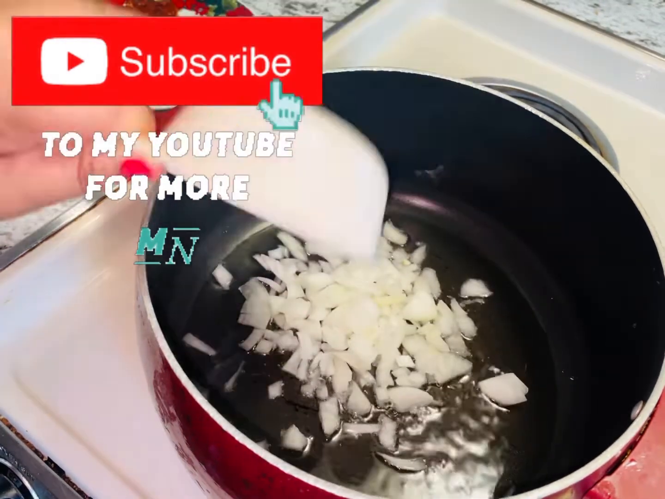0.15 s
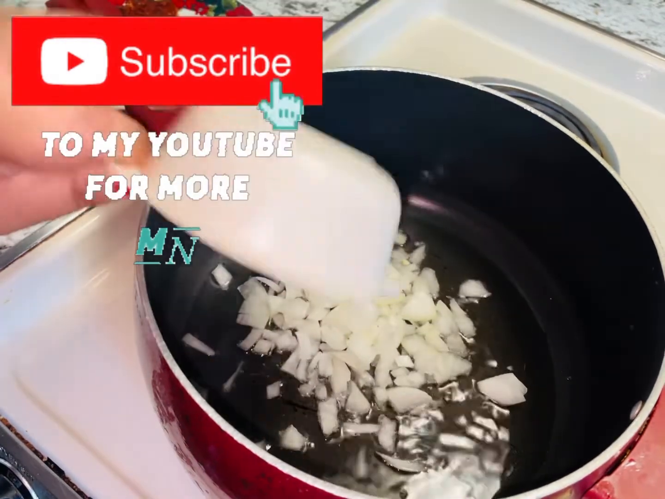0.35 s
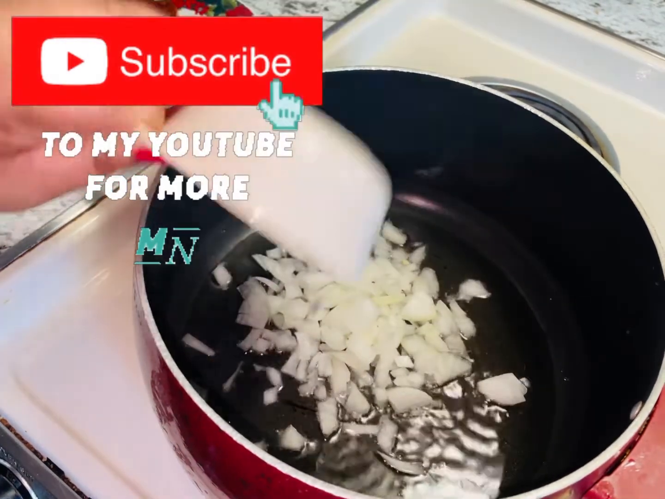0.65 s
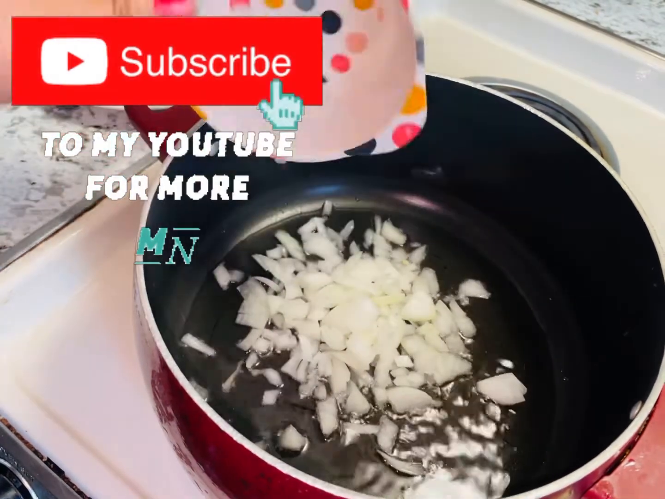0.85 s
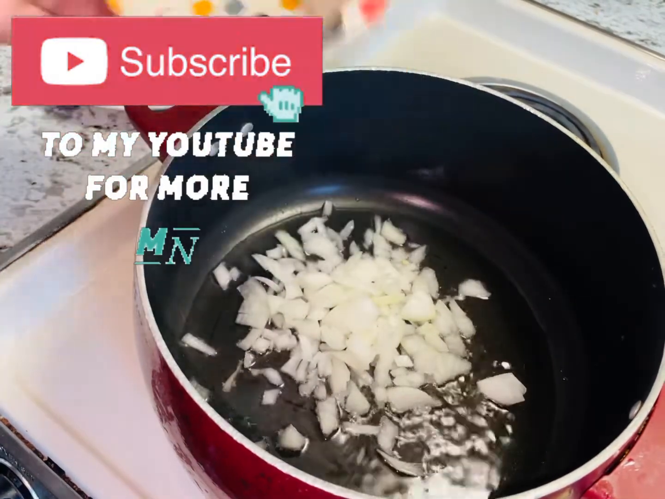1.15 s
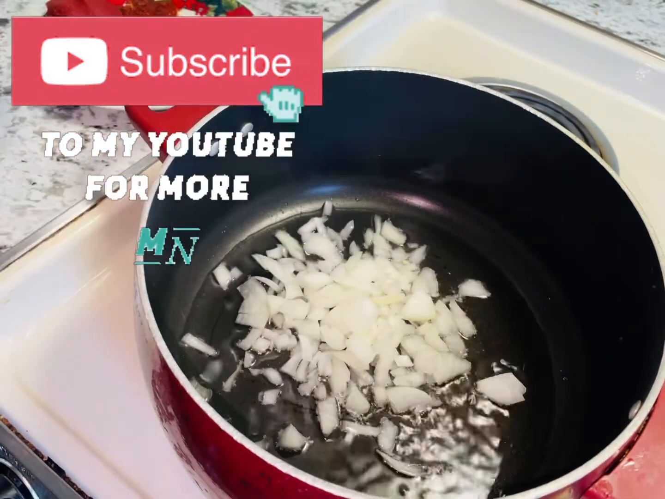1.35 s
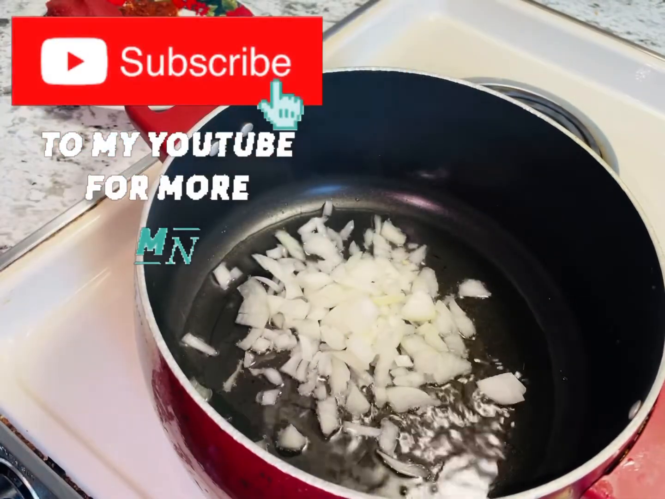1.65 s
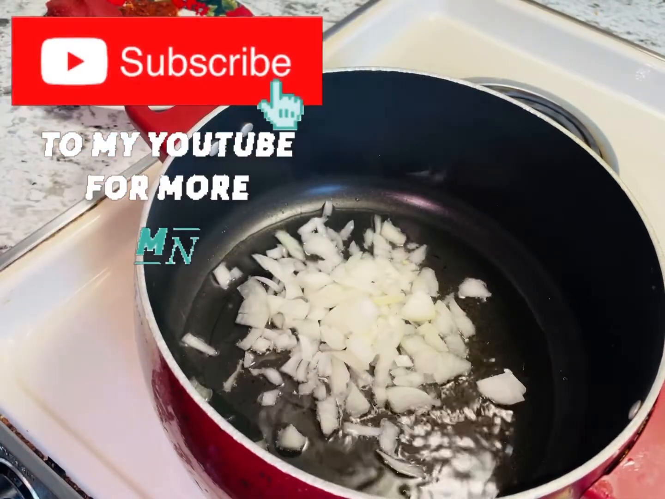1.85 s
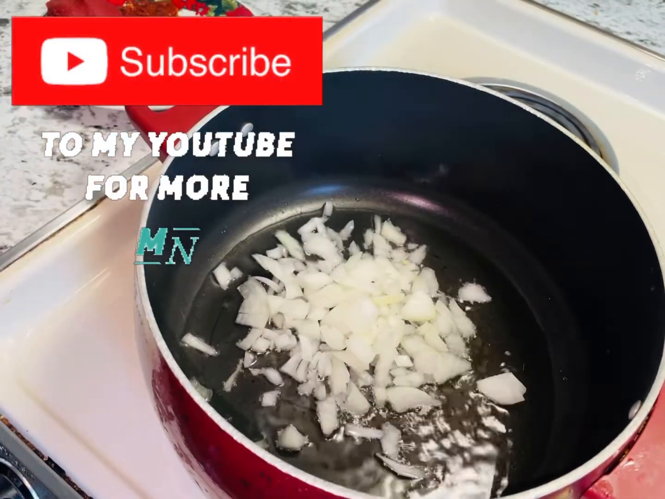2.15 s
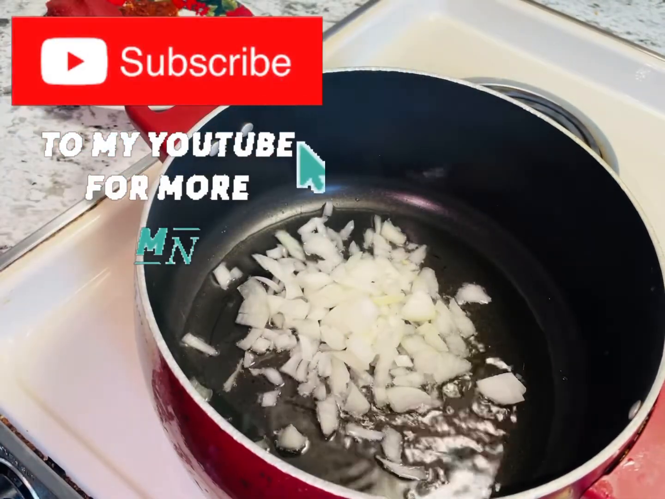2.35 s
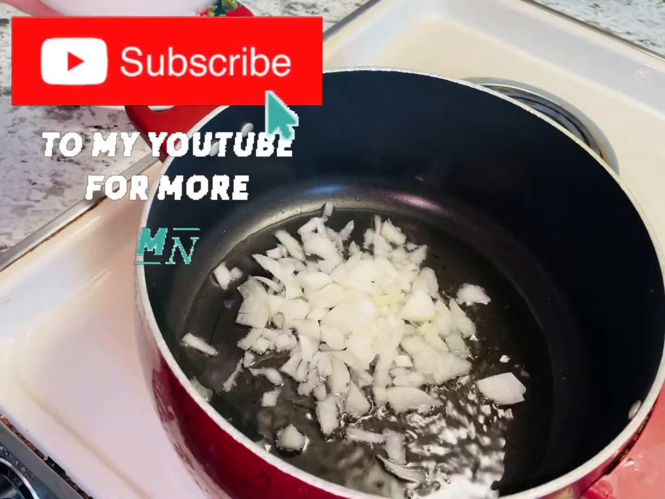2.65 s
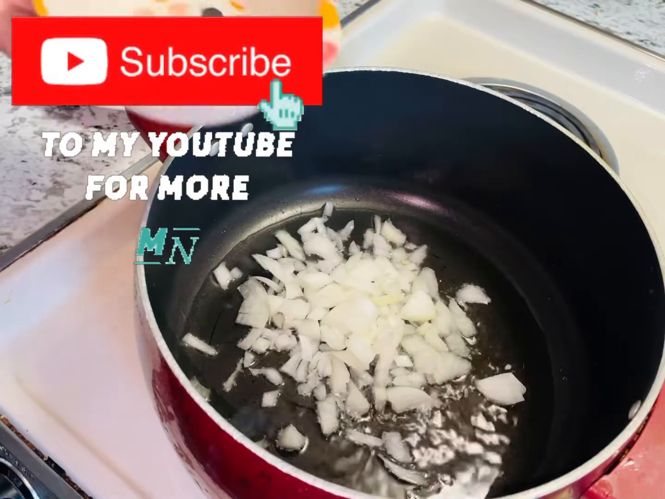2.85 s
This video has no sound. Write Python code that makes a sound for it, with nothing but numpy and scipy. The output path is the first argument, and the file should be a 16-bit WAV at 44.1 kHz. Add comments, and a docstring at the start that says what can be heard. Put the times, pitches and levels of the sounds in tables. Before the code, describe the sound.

Onion fries in hot oil with a steady, crackling sizzle in a kitchen. Early on a spatula knocks and briefly scrapes a bowl over the pot; then a utensil clacks twice as the sizzling eases slightly.

```python
"""Onion frying in a pot

Chopped onion sizzles in hot oil in a metal pot: bursting steam bubbles fizz and crackle, and water
drops flash to steam in sharp spits, all coloured by the pot's resonances. A spatula knocks once, then
taps and scrapes twice as it clears the bowl over the pot, driving modes by impact and by friction.
Later a utensil is set down with a double clack. An appliance hums underneath."""
import sys
import numpy as np
from scipy import signal
from scipy.fft import rfft, irfft
from scipy.io import wavfile

SR = 44100
rng = np.random.default_rng(int(sys.argv[2]) if len(sys.argv) > 2 else 0)


def to_wav(s):
    """Save 16-bit WAV."""
    ch = np.atleast_2d(s).T  # columns
    pcm = np.round(np.clip(ch, -1, 1) * 32767)  # PCM
    wavfile.write(sys.argv[1], SR, pcm.astype(np.int16))


N = 132300

# Background rumble: frequency_hz, density_db
RUMBLE_SPECTRUM = [(20, -53), (55, -27), (85, -3), (120, -1.5), (160, -4), (400, -8), (700, -16),
                   (3000, -20), (16000, -53)]
# Mains hum: pitch_hz, level_db
HUM_PARTIALS = [(59.6, -58), (119.6, -55)]
# Kitchen reverberation: frequency_hz, t60_s
ROOM_DECAY = [(100, 0.76), (1000, 0.45), (4000, 0.39), (14000, 0.21)]

# Utensil impacts: start_s, level_db, pitch_ratio
UTENSIL_IMPACTS = [(1.8305, -10.5, 1.03), (1.8392, -3, 1.25), (1.883, -0.5, 1.0), (1.8895, -9, 0.97)]
# Utensil modes: pitch_hz, level_db, t60_s
UTENSIL_MODES = [(1776, 1, .05), (1935, -6, .03), (2230, -4, .022), (2600, -7, .02), (3740, -4, .04)]
# Utensil contact noise: frequency_hz, density_db
CLACK_SPECTRUM = [(100, -13), (400, -5.5), (1200, -6.5), (2200, 2.5), (3200, -8), (5200, -7), (16000, -45)]

# Spatula impacts: start_s, thud_db, tick_db, ring_db
SPATULA_KNOCKS = [(0.1615, -3, -1, -2.5), (0.1717, -4, -10, -10), (0.433, -7, -13, -13.5),
                  (0.4438, -14, -16.5, -24), (0.6344, -6.5, -6, -14), (2.852, -31, -51, -27)]
# Spatula strokes: start_s, rise_s, hold_s, release_s, level_db
SPATULA_SCRAPES = [(0.47, 0.021, 0.06, 0.071, -36), (0.631, 0.057, 0.048, 0.069, -34)]
# Modes the spatula excites: pitch_hz, t60_s, struck_db, rubbed_db
VESSEL_MODES = [(159, 0.33, -28, -6), (264, 0.029, 2.5, -12), (405, 0.11, -10, -1), (461, 0.11, -3, -4),
                (545, 0.45, -6.5, -3.5), (827, 0.11, -7, -9), (904, 0.14, -2.5, -2.5),
                (950.5, .17, 1.5, -1.5), (1341, 0.098, 4.5, -9.5), (1438, 0.051, -0.5, -5.5),
                (2840, 0.036, 3, -13), (4850, 0.027, 2, -2)]
# Dull part of a knock: frequency_hz, density_db
THUD_SPECTRUM = [(60, -15), (200, -5.5), (400, 4.5), (900, -2.5), (1130, -10), (1400, 0), (1950, -10),
                 (5000, -8), (12000, -53)]
# Bright part of a knock: frequency_hz, density_db
TICK_SPECTRUM = [(300, -3), (1500, -11), (4000, -3.5), (5200, 1), (7200, 5.5), (9500, -5.5), (16000, -19)]
# Friction noise: frequency_hz, density_db
RUB_SPECTRUM = [(100, -5), (650, -2.5), (950, 6), (1170, -34), (1450, 2), (2800, 3.5), (5000, -1.5),
                (16000, -21)]

# Droplets hitting the pot: frequency_hz, density_db
SPRAY_SPECTRUM = [(1000, -20), (5000, -5), (10000, 0), (16000, 1)]
# Spits of oil: start_s, level_db, bubble_pitch_hz, relative_snap_db
OIL_SPITS = [(0.1422, -21, 8600, -14), (0.4752, -15.5, 12800, -10), (0.77, -24, 6450, -2),
             (0.902, -23.5, 5100, 9), (0.941, -23.5, 3620, 3.5), (1.134, -22.5, 3340, 2),
             (1.1579, -17.5, 5660, 8), (1.2971, -19, 3040, -2.5), (1.397, -19.5, 5400, -8),
             (1.463, -32.5, 1930, -10), (1.585, -19, 5230, -4), (1.996, -25.5, 5440, 6),
             (2.083, -23.5, 6770, 3.5), (2.14, -26, 3100, -10), (2.2212, -28.5, 8350, 7.5),
             (2.295, -30, 2520, 6), (2.483, -30, 3560, 3.5), (2.5955, -27.5, 6800, 5),
             (2.709, -30, 5680, 6), (2.7865, -27, 6700, 0)]
# Snap of a spit: frequency_hz, density_db
SNAP_SPECTRUM = [(500, -15), (2000, 2), (3500, 8), (6000, 19.5), (10000, 13.5), (16000, -8)]
# Frying noise: frequency_hz, density_db
SIZZLE_SPECTRUM = [(300, -40), (1000, -20.5), (3200, -6.5), (5600, 1.5), (8500, 0.5), (13500, -5.5),
                   (16000, -5.5)]
# Pot resonances: centre_hz, width_hz, gain_db
POT_RESONANCES = [(1864, 153, 13.8), (2450, 97, 9.7), (3050, 170, 11), (3650, 460, 5.7)]

RUMBLE_DB = -49.5
CLACK_RING_DB, CLACK_NOISE_DB = -23, -21
KNOCK_RING_DB, THUD_DB, TICK_DB, THUD_RISE_S = -23.5, -15.5, -13.5, 0.0019
RUB_NOISE_DB, RUB_RING_DB, SLIPS_PER_S = -7.5, -8.5, 1500
CHATTER_DB, BLADE_DAMPING_HZ, PITCH_WANDER = 2, 22, 0.022
SPRAY_DB, SPRAY_PER_S, PUFF_DB = -51.5, 70, -11
BUBBLE_GAP_S, BUBBLE_FALL_DB, BUBBLE_SCATTER, BUBBLE_T60_CYCLES = 0.0013, 3, 0.07, 24
FIZZ_DB, FLICKER_DB, CRACKLE_DB, CRACKLES_PER_S = -42, 0.6, -44.5, 2200
COOLING_DB_PER_S, POT_ECHO_T60_S = 1.27, 0.03
BAND_LIMIT_HZ = 15950


def amp(db):
    """Amplitude grows tenfold every 20 decibels."""
    return 10 ** (np.asarray(db) / 20)


def unit_rms(x):
    """Normalisation to unit mean power."""
    return x / np.sqrt(np.mean(x ** 2) + 1e-20)


def interpolate(points, hz):
    """Interpolation on a log-frequency axis."""
    knots_hz, values = np.transpose(points)
    return np.interp(np.log(hz + 1), np.log(knots_hz + 1), values)


def add(mix, start_s, sound):
    """Superposition of a delayed sound on a mix."""
    part = mix[max(round(start_s * SR), 0):][:len(sound)]
    part += sound[:len(part)]


def convolve(x, response):
    """Convolution with an impulse response scaled to unit energy."""
    return signal.oaconvolve(x, response / np.linalg.norm(response))[:len(x)]


def colour(x, spectrum, resonances=()):
    """Minimum-phase filtering by a relative spectrum with Lorentzian peaks."""
    size = 4096
    hz = abs(np.fft.fftfreq(size, 1 / SR))
    peaks_db = sum(db / (1 + (2 * (hz - centre) / width) ** 2) for centre, width, db in resonances)
    log_gain = np.log(amp(interpolate(spectrum, hz) + peaks_db))
    transfer = np.exp(np.conj(signal.hilbert(log_gain)))
    return convolve(x, np.fft.ifft(transfer).real[:size // 2])


def decay(t60_s):
    """Half a second of exponential damping, 60 dB down at t60_s."""
    return np.exp(-np.log(1000) * np.arange(SR // 2) / SR / max(t60_s, 1e-4))


def ring(modes, pitch_ratio=1):
    """Free vibration: a sum of damped sinusoids of alternating sign."""
    t = np.arange(SR // 2) / SR
    return sum((-1) ** k * amp(db) * decay(t60_s) * np.sin(2 * np.pi * hz * pitch_ratio * t)
               for k, (hz, db, t60_s) in enumerate(modes))


def resonate(x, hz, width_hz):
    """Forced vibration of a unit-energy resonator that follows a pitch curve."""
    phasor = np.exp(2j * np.pi * np.cumsum(hz) / SR)
    pole = np.exp(-np.pi * width_hz / SR)
    envelope = signal.lfilter([1 - pole], [1, -pole], x / phasor + 1e-18)
    return 2 * (phasor * envelope).real / np.sqrt(1 - pole)


def burst(spectrum, t60_s):
    """Dense, heavily damped modes merge into decaying noise."""
    return colour(rng.standard_normal(SR // 2) * decay(t60_s), spectrum)


def drift(cutoff_hz):
    """Low-passed noise gives a slow fluctuation of rms 1."""
    passband = np.fft.rfftfreq(N, 1 / SR) < cutoff_hz
    return unit_rms(irfft(rfft(rng.standard_normal(N)) * passband, N))


def clicks(per_s, spread_db):
    """A Poisson train of impulses, most small and a few large."""
    chance, size, sign = rng.random((3, N))
    level_db = spread_db * np.minimum(-np.log(size + 1e-12), 5)
    return (chance < per_s / SR) * amp(level_db) * np.sign(sign - .5)


def in_pot(x, wall_db):
    """Reflections between the pot's walls add quick echoes."""
    t = np.arange(SR // 2) / SR
    echoes = rng.standard_normal(SR // 2) * decay(POT_ECHO_T60_S) * (t > .0005)
    return x + amp(wall_db) * convolve(x, echoes)


def in_room(x, wet_db):
    """Diffuse reverberation adds a tail whose treble dies first."""
    hz, t, noise = signal.stft(rng.standard_normal(SR // 2), SR, nperseg=256)
    envelope = np.exp(-np.log(1000) * t / interpolate(ROOM_DECAY, hz)[:, None]) * (t > .008)
    tail = signal.istft(noise * envelope, SR)[1]
    return x + amp(wet_db) * convolve(x, tail)


def kitchen():
    """An appliance's mains hum, slightly phase-modulated, lies over a low rumble."""
    t = np.arange(N) / SR
    hum = sum(amp(db) * np.sqrt(2) * np.sin(2 * np.pi * hz * t + .2 * drift(cutoff_hz=4))
              for hz, db in HUM_PARTIALS)
    return hum + amp(RUMBLE_DB) * colour(rng.standard_normal(N), RUMBLE_SPECTRUM)


def utensil():
    """Impacts excite a hard utensil's modes as it lands on one end, then the other."""
    out = np.zeros(N)
    for start_s, db, pitch_ratio in UTENSIL_IMPACTS:
        ringing = amp(CLACK_RING_DB) * ring(UTENSIL_MODES, pitch_ratio)
        contact = amp(CLACK_NOISE_DB) * burst(CLACK_SPECTRUM, t60_s=.04)
        add(out, start_s, amp(db) * (ringing + contact))
    return in_room(out, wet_db=-9)


def spatula_knocks():
    """Impulsive excitation: each knock gives a thud and a tick and leaves the modes ringing."""
    out = np.zeros(N)
    body = ring([(hz, db, t60_s) for hz, t60_s, db, _ in VESSEL_MODES])
    onset = 1 - np.exp(-np.arange(SR // 2) / SR / THUD_RISE_S)  # the soft blade flexes as it lands
    for start_s, thud_db, tick_db, ring_db in SPATULA_KNOCKS:
        ringing = amp(ring_db + KNOCK_RING_DB) * body
        thud = amp(thud_db + THUD_DB) * burst(THUD_SPECTRUM, t60_s=.069)
        tick = amp(tick_db + TICK_DB) * burst(TICK_SPECTRUM, t60_s=.018)
        add(out, start_s, onset * (ringing + thud) + tick)
    return out


def spatula_scrapes():
    """Stick-slip friction drives the modes while the blade damps them and pulls their pitch about."""
    force = sum(amp(db) * np.interp(np.arange(N) / SR, start_s + np.cumsum([0, *spans_s]), [0, 1, 1, 0])
                for start_s, *spans_s, db in SPATULA_SCRAPES)
    slips = unit_rms(clicks(SLIPS_PER_S, spread_db=1.5)) * force
    slips *= amp(CHATTER_DB * drift(cutoff_hz=69))  # the blade grips unevenly
    pitch_ratio = 1 + PITCH_WANDER * drift(cutoff_hz=18)
    out = amp(RUB_NOISE_DB) * colour(slips, RUB_SPECTRUM)
    for hz, t60_s, _, rubbed_db in VESSEL_MODES:
        width_hz = np.log(1000) / np.pi / t60_s + BLADE_DAMPING_HZ
        out += amp(RUB_RING_DB + rubbed_db) * resonate(slips, hz * pitch_ratio, width_hz)
    return out


def spray():
    """Impacts of fine droplets on the pot radiate sparse, bright ticks."""
    ticks = colour(clicks(SPRAY_PER_S, spread_db=3), SPRAY_SPECTRUM)
    return amp(SPRAY_DB) * unit_rms(in_pot(ticks, wall_db=-10))


def bubbles(hz):
    """Three bubbles burst in quick succession, each resonating at a pitch set by its size."""
    out = np.zeros(SR // 2)
    for k, detune in enumerate(BUBBLE_SCATTER * rng.uniform(-1, 1, 3)):
        mode = (hz * (1 + detune), -BUBBLE_FALL_DB * k, BUBBLE_T60_CYCLES / hz)
        add(out, BUBBLE_GAP_S * k, ring([mode]))
    return out


def spits():
    """Flash boiling of water drops gives a snap, a puff of spray and briefly ringing bubbles."""
    out = np.zeros(N)
    crack = colour(signal.unit_impulse(SR // 2), SNAP_SPECTRUM, POT_RESONANCES)
    crack /= abs(crack).max()
    for start_s, db, hz, snap_db in OIL_SPITS:
        puff = amp(PUFF_DB) * burst(SNAP_SPECTRUM, t60_s=.0086)
        add(out, start_s, amp(db) * (amp(-3) * bubbles(hz) + amp(snap_db) * (crack + puff)))
    return in_room(in_pot(out, wall_db=-3.5), wet_db=-22)


def sizzle():
    """Countless bursting steam bubbles add incoherently, easing as the onion cools the oil."""
    noise = rng.standard_normal(N) * amp(FLICKER_DB * drift(cutoff_hz=57))
    fizz = amp(FIZZ_DB) * colour(noise, SIZZLE_SPECTRUM, POT_RESONANCES)
    pops = np.zeros(N)
    pitches_hz = np.geomspace(3000, 14000, num=12)
    for hz in pitches_hz:
        bubble = ring([(hz, 0, 7 / hz)])  # dies away in seven cycles
        impulses = clicks(CRACKLES_PER_S / len(pitches_hz), spread_db=4.5)
        pops += in_pot(convolve(impulses, bubble), wall_db=-4)
    crackle = amp(CRACKLE_DB) * unit_rms(colour(pops, SIZZLE_SPECTRUM, POT_RESONANCES))
    cooling = amp(-COOLING_DB_PER_S * (np.arange(N) - N / 2) / SR)
    return (fizz + crackle) * cooling


def scene():
    """The pressures of all sources superpose at one microphone."""
    frying = sizzle() + spray() + spits()
    spatula = in_room(spatula_knocks() + spatula_scrapes(), wet_db=-10.5)
    return (frying + spatula + utensil() + kitchen())[None]


def record(dry):
    """A linear-phase low-pass filter limits the bandwidth."""
    lowpass = signal.firwin(511, BAND_LIMIT_HZ, window=("kaiser", 9), fs=SR)
    return signal.oaconvolve(dry, lowpass[None], "same")


dry = scene()
out = record(dry)
to_wav(out)
```